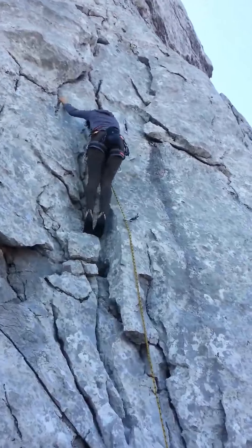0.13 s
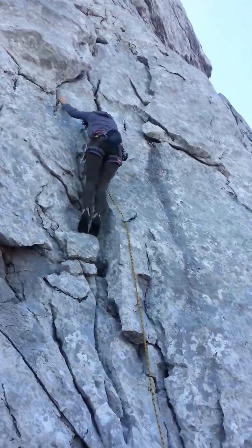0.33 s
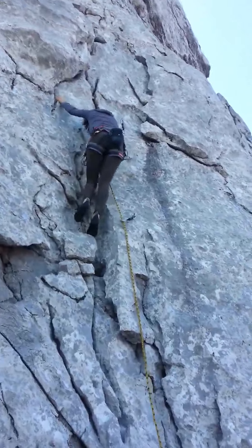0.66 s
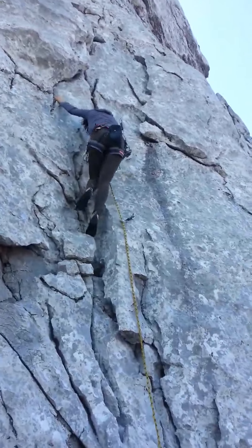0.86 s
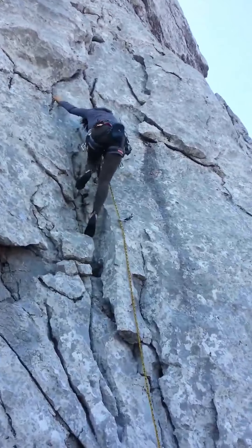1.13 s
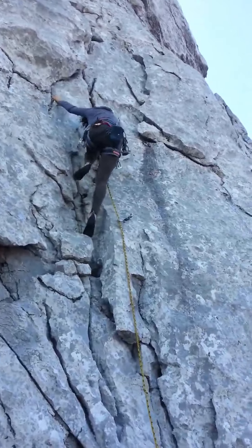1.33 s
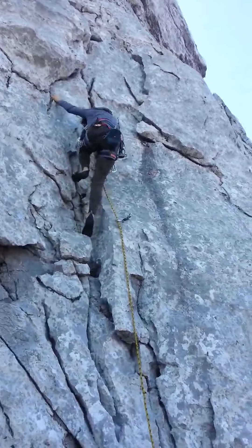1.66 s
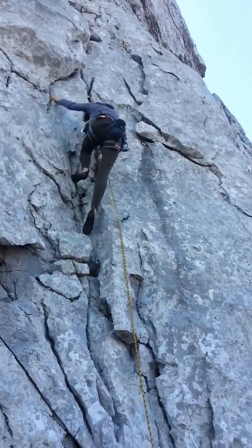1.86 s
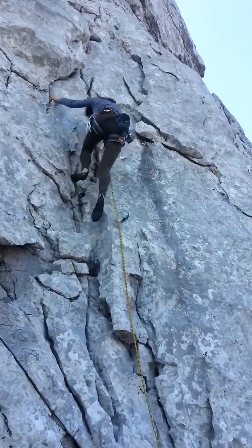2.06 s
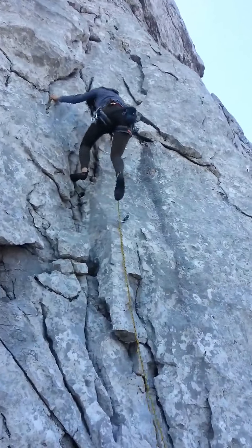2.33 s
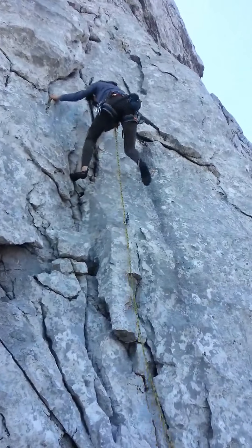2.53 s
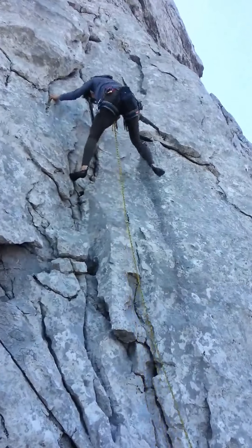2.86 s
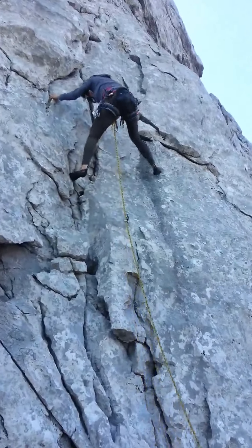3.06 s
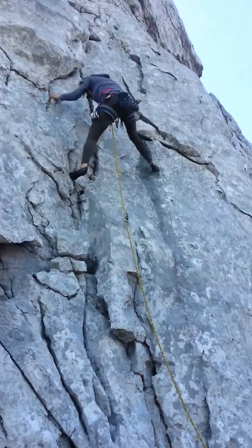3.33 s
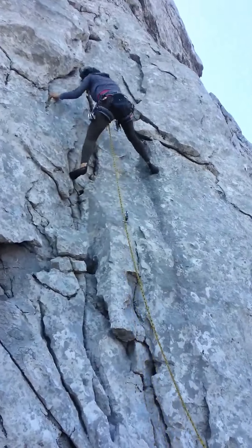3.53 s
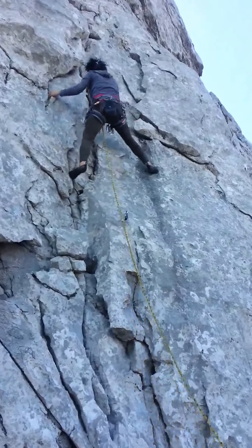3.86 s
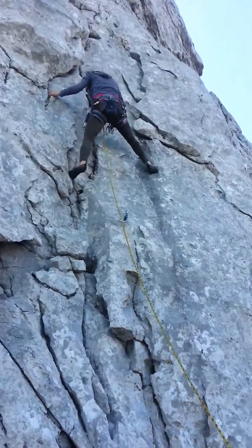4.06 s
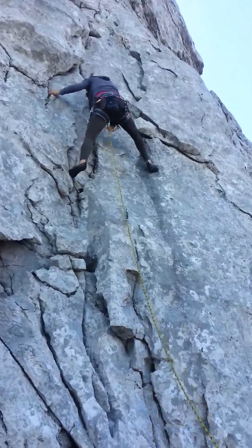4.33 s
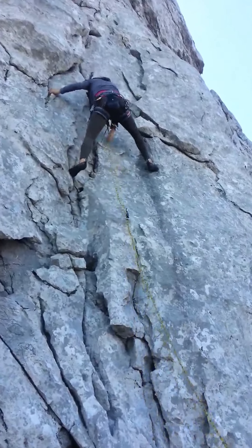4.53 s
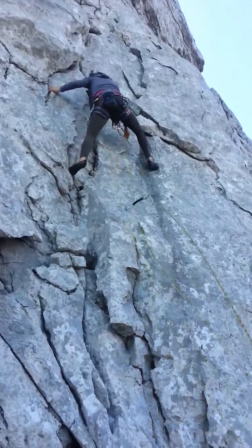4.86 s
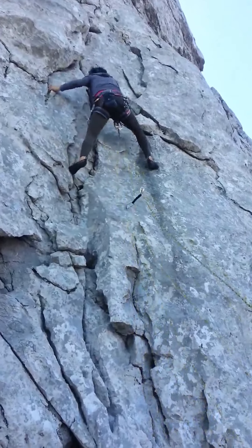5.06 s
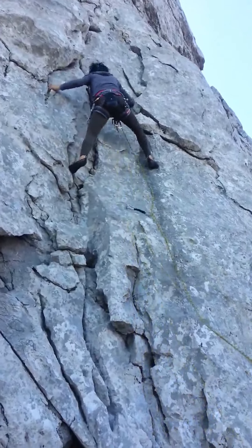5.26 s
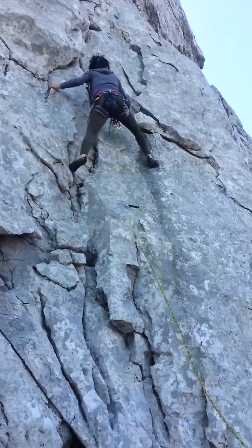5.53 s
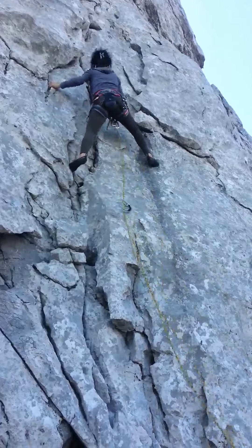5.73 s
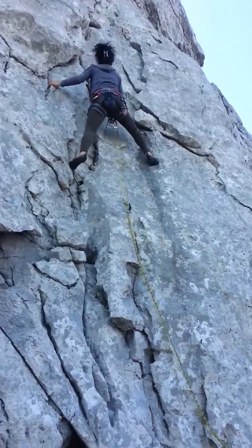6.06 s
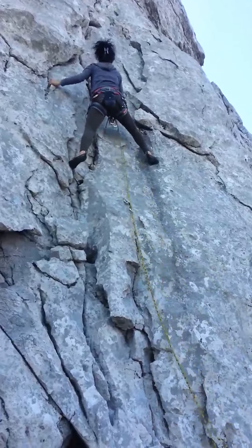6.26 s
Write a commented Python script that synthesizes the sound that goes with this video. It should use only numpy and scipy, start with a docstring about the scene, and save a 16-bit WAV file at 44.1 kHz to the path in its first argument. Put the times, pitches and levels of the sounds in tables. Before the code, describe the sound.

Outdoors below a cliff, faint distant wind and microphone hiss lie under the irregular clinking of metal climbing gear. The pieces first chatter and jingle lightly, then tick only now and then, before clacking together in several stronger bursts, the loudest near the end. Now and again metal snaps against stone, and shoes and rope bump and rub quietly on the rock. The knocks are crisp and die away quickly.

```python
"""Outdoors below a rock face: metal gear knocks together on a climber's harness.
Each knock is a short chatter of contacts in heavily damped metal, scattered back by the rough rock.
Hanging pieces ring and jingle, metal snaps on stone, shoes and rope thud and scuff.
Far valley air and microphone hiss lie underneath."""
import sys
import numpy as np
from scipy import signal
from scipy.io import wavfile

SR = 44100
rng = np.random.default_rng(int(sys.argv[2]) if len(sys.argv) > 2 else 0)


def store_pcm(level_fs):
    """Save levels as 16-bit WAV."""
    pcm = np.round(np.clip(level_fs, -1, 1) * 32767).astype(np.int16)
    wavfile.write(sys.argv[1], SR, np.atleast_2d(pcm).T)


N = 282681


def from_db(db):
    return 10 ** (np.asarray(db) / 20)


def unit_rms(x):
    return x / np.sqrt(np.mean(x ** 2) + 1e-20)


def at_hz(points, hz):
    points_hz, values = np.transpose(points)
    return np.interp(np.log(hz), np.log(points_hz), values)


def pan(left_minus_right_db):
    return from_db([[left_minus_right_db / 2], [-left_minus_right_db / 2]])


def add(out, start_s, sound):
    i = round(start_s * SR)
    out[:, i:i + sound.shape[1]] += sound[:, :N - i]


def grains(shape, per_s, uneven_db):
    """Sparse clicks of uneven size and random sign."""
    sizes = from_db(uneven_db * np.minimum(rng.exponential(1, shape), 4))
    return sizes * rng.choice([-1, 1], shape) * (rng.random(shape) < per_s / SR)


def damped_mode(force, hz, t60_s):
    """One resonance driven by a force."""
    r, w = np.exp(-np.log(1000) / (t60_s * SR)), 2 * np.pi * hz / SR
    return signal.lfilter([0, np.sin(w)], [1, -2 * r * np.cos(w), r * r], force + 1e-18)


def metal_body(force, modes, tints_db, draws):
    """Parallel modes; each blow finds the pieces lying differently, so pitch and strength shift."""
    out = 0
    for (hz, db, t60_s, pan_db), tint_db, draw in zip(modes, tints_db, draws):
        shifted_hz = min(hz * (1 + .035 * draw[0]), 15000)
        gain = from_db(db + tint_db + 2.2 * draw[1:, None]) * pan(pan_db)
        out = out + gain * damped_mode(force, shifted_hz, t60_s) / np.sqrt(t60_s)
    return out


# Damped modes of the bunched gear, low (clank) and high (tick).
# Each row: frequency in Hz, relative level in dB, t60 in seconds, left minus right in dB.
CLANK_MODES = [(2150, -4, .006, 6), (2660, 2, .013, 7), (3150, -3, .007, 6)]
TICK_MODES = [(4310, 14, 0.0072, 4.5), (5370, 12, 0.0045, 11.5), (6500, 10, 0.0011, 11.5),
              (6790, -6.5, 0.0064, 14.5), (7720, 18.5, 0.0072, 1.5), (9400, 3, 0.012, 21),
              (11400, -13, 0.005, 1), (11940, 3, 0.0021, -12), (13700, -5.5, 0.00057, -6)]
# Each row: start in seconds, tick peak in dB, clank rms over the first 10 ms in dB, tick centre in Hz.
GEAR_KNOCKS = [(0.2296, -42, -53.5, 5400), (0.2851, -24, -46.5, 5800), (.303, -27, -47, 11100),
               (0.3207, -28.5, -47.5, 9020), (0.3363, -35, -49, 6600), (0.3693, -33, -49.5, 5270),
               (.4057, -32.5, -53, 8100), (0.434, -34, -60, 5500), (0.4548, -27, -51, 8360),
               (.521, -22.5, -56, 6200), (0.5662, -32.5, -50.5, 7840), (0.5926, -38, -68, 5080),
               (0.635, -40, -51, 4150), (0.6524, -47, -48, 7990), (0.6861, -42.5, -44, 6560),
               (0.7026, -49, -48, 4360), (0.736, -53, -56, 4000), (0.7453, -53, -51, 7040),
               (0.79, -58, -56, 4050), (0.8068, -40, -70, 5380), (0.9426, -37.5, -58, 5490),
               (1.175, -33.5, -60, 6700), (1.2402, -27.5, -48.5, 8560), (1.302, -29, -51.5, 10500),
               (1.3268, -35, -55.5, 8470), (1.355, -30.5, -48, 5700), (1.753, -49, -54.5, 6500),
               (2.0784, -40, -58, 5530), (2.3272, -36.5, -56, 5370), (2.5134, -47, -57.5, 5200),
               (2.6506, -30, -73, 11000), (2.6681, -26, -72, 7800), (2.804, -39, -57, 7600),
               (2.972, -36, -56, 7760), (3.034, -44, -69, 6000), (3.042, -30, -50.5, 7850),
               (3.1527, -18.5, -37, 8040), (3.1634, -19, -42.5, 6650), (3.243, -33, -56.5, 7040),
               (3.5357, -25.5, -49, 7200), (3.8456, -38.5, -67, 8000), (4.091, -42.5, -61, 8700),
               (4.2564, -7.5, -34, 8900), (4.2688, -7.5, -36.5, 10000), (4.3117, -20, -50, 8900),
               (4.318, -15.5, -41, 8820), (4.344, -28, -42, 5000), (4.35, -24.5, -44, 7100),
               (4.396, -41, -47, 7550), (4.4853, -24, -83, 9500), (4.7103, -33.5, -50, 4330),
               (4.782, -50, -61, 6400), (4.8947, -22.5, -40, 4740), (5.0464, -26, -47.5, 6600),
               (5.103, -28.5, -43.5, 7500), (5.1742, -39.5, -46, 3840), (5.2043, -48, -44, 4100),
               (5.251, -52, -48, 5170), (5.2685, -31, -46, 4480), (5.3331, -25, -31.5, 7700),
               (5.3366, -3.5, -25, 8400), (5.3453, -16, -32, 7800), (5.4293, -32, -74, 4840),
               (5.4404, -43, -48, 4650), (5.549, -46, -57, 4580), (5.589, -22, -40, 5600),
               (5.6145, -16, -33, 7600), (5.674, -34, -43, 4000), (5.6766, -13.5, -38, 8700),
               (5.904, -30, -64, 6660)]


def gear_knocks(chatter_s=.0038, scatter_t60_s=.13, scatter_gain_db=-36, spray_gain_db=-15.5):
    """A few ms of contacts and their patter of rock echoes drive the metal's modes."""
    out, t = np.zeros((2, N)), np.arange(int(.16 * SR)) / SR
    tick_hz = np.array(TICK_MODES)[:, 0]
    spread_octaves, left_lag_samples = .68, 4
    bass_cut = signal.butter(4, 1900, "high", fs=SR, output="sos")  # small parts radiate no bass
    tick_cut = signal.butter(2, 3000, "high", fs=SR, output="sos")
    spray_band = signal.butter(2, [1500, 10300], "band", fs=SR, output="sos")
    attack, fade = 1 - np.exp(-t / .00098), np.exp(-(t / chatter_s) ** 2)
    echo_envelope = np.exp(-np.log(1000) * t / scatter_t60_s) * (1 - fade)
    for start_s, tick_db, clank_db, centre_hz in GEAR_KNOCKS:
        contacts = grains(len(t), per_s=6600, uneven_db=4.5) * attack * fade
        contacts[20] = .29  # first touch
        contacts /= np.linalg.norm(contacts)
        direct = np.array([np.roll(contacts, left_lag_samples), contacts])
        patter = rng.standard_normal((2, len(t))) * echo_envelope
        force = signal.sosfilt(bass_cut, direct + from_db(scatter_gain_db) * patter)
        draws = rng.standard_normal((len(CLANK_MODES) + len(TICK_MODES), 3))
        clank = metal_body(force, CLANK_MODES, np.zeros(len(CLANK_MODES)), draws)
        clank /= np.sqrt(np.mean(clank[:, :int(.01 * SR)] ** 2))
        tints_db = -6 * (np.log2(tick_hz / centre_hz) / spread_octaves) ** 2
        tick = metal_body(force, TICK_MODES, tints_db, draws[len(CLANK_MODES):])
        tick = signal.sosfilt(tick_cut, tick)
        tick /= np.abs(tick).max(axis=1).mean()
        spray = from_db(spray_gain_db) * signal.sosfilt(spray_band, patter[::-1])  # unpitched echoes
        add(out, start_s, from_db(clank_db) * clank + from_db(tick_db) * (tick + spray))
    return out


# Decay of hanging pieces. Each row: frequency in Hz, t60 in seconds.
RING_DECAY = [(2680, 0.07), (4000, 0.078), (6630, 0.012), (10900, .055)]
# Each row: start in seconds, peak in dB, pitch in Hz.
HANGING_RINGS = [(0.302, -33.5, 11040), (0.407, -43, 2650), (1.248, -48, 10700), (1.304, -42, 10850),
                 (1.356, -47, 3900), (2.146, -56, 2600), (2.333, -47, 3900), (2.692, -43.5, 4020),
                 (3.19, -45, 3950), (4.783, -36.5, 6630), (5.205, -41, 4120), (5.441, -40, 3510),
                 (5.909, -43, 2680)]


def hanging_rings(jostle_s=.0045):
    """A freely hanging piece is jostled and sings on briefly in one wavering mode."""
    out, t = np.zeros((2, N)), np.arange(int(.15 * SR)) / SR
    for start_s, peak_db, hz in HANGING_RINGS:
        force = rng.standard_normal((2, len(t))) * np.exp(-t / jostle_s)
        tone = damped_mode(force, hz, at_hz(RING_DECAY, hz))
        add(out, start_s, from_db(peak_db) * tone / np.abs(tone).max())
    return out


# Each row: start in seconds, end in seconds, level in dB, pitch in Hz.
HARNESS_SWAYS = [(0.27, 0.562, -58, 2660), (0.627, .77, -56.5, 2130), (2.752, 3.123, -68, 3940),
                 (4.813, 4.92, -49, 3240), (4.837, 4.937, -48.5, 4440), (5.0, 5.37, -60, 2670)]


def harness_jingle(edge_s=.046):
    """While the harness sways, small uneven jolts keep one gear mode ringing."""
    out, t = np.zeros((2, N)), np.arange(SR // 2) / SR
    for start_s, end_s, db, hz in HARNESS_SWAYS:
        jolts = grains((2, len(t)), per_s=590, uneven_db=2)
        sway = np.clip(np.minimum(t, end_s - start_s - t) / edge_s, 0, 1)
        add(out, start_s, from_db(db) * sway * unit_rms(damped_mode(jolts, hz, t60_s=.015)))
    return out


# Each row: start in seconds, peak before panning in dB, nominal band centre in Hz.
STONE_SNAPS = [(1.711, -47, 2020), (2.292, -38, 1270), (3.172, -30, 2290), (3.443, -47, 1700),
               (3.473, -30, 2300), (5.346, -20, 1860), (6.1569, -21.5, 3400), (6.196, -42, 3500)]


def stone_snaps(scatter_t60_s=.14, pan_db=3):
    """One dry contact of metal on stone: a band-limited click with faint patter from the rock."""
    out, t = np.zeros((2, N)), np.arange(int(.08 * SR)) / SR
    for start_s, peak_db, hz in STONE_SNAPS:
        patter = .032 * rng.standard_normal((2, len(t))) * np.exp(-np.log(1000) * t / scatter_t60_s)
        band = signal.butter(4, [hz / 2, hz * 1.39], "band", fs=SR, output="sos")
        snap = signal.sosfilt(band, (t == 0) + patter)
        add(out, start_s, from_db(peak_db) * pan(pan_db) * snap / np.abs(snap).max())
    return out


# Each row: start in seconds, peak before panning in dB, pitch in Hz.
STONE_THUDS = [(.294, -35.5, 470), (.386, -40, 643), (.7, -43.5, 265), (1.71, -42.5, 292),
               (2.291, -40, 960), (3.169, -28, 720), (3.443, -40.5, 880), (3.471, -41, 533),
               (4.24, -46, 373), (4.327, -38, 900), (4.864, -41, 476), (4.891, -40, 423), (5.345, -31, 370),
               (5.622, -41.5, 344), (5.677, -36.5, 675)]


def stone_thuds(t60_cycles=5.9, pan_db=1.4):
    """Shoes, rope and gear land softly on stone: grit drives a dull mode and two broader overtones."""
    out, t = np.zeros((2, N)), np.arange(int(.12 * SR)) / SR
    envelope = np.exp(-t / .0091) * (1 - np.exp(-t / .00044))
    for start_s, peak_db, hz in STONE_THUDS:
        noise, t60_s = rng.standard_normal((3, len(t))), t60_cycles / hz
        bass_cut = signal.butter(4, .83 * hz, "high", fs=SR, output="sos")
        force = signal.sosfilt(bass_cut, (noise[0] + .81 * noise[1:]) * envelope)
        thud = damped_mode(force, hz, t60_s)
        thud += .39 * damped_mode(force, 1.26 * hz, t60_s / 2)
        thud += .42 * damped_mode(force, 2.76 * hz, t60_s / 3)
        add(out, start_s, from_db(peak_db) * pan(pan_db) * thud / np.abs(thud).max())
    return out


def drift(corner_hz, hop=40):
    """Slow random wander of unit rms."""
    r = np.exp(-2 * np.pi * corner_hz * hop / SR)
    noise = rng.standard_normal(N // hop + 2002)
    slow = signal.lfilter([1], [1, -2 * r, r * r], noise)[2000:]
    return np.interp(np.arange(N) / hop, np.arange(len(slow)), unit_rms(slow))


# Stereo width of scuff and air. Each row: frequency in Hz, left-right correlation.
STEREO_CORRELATION = [(60, -0.012), (180, 0.14), (550, 0.11), (1650, -0.051), (4970, -0.023),
                      (15000, -0.11)]


def flickering_bands(noises, spectrum, flicker_db, calmer_above_hz=1040):
    """Half-octave noise bands, each with its own level, flicker and stereo width."""
    out, edges_hz = 0, 22 * 2 ** np.arange(0, 10, .5)
    for k, (low_hz, high_hz) in enumerate(zip(edges_hz, edges_hz[1:])):
        band = signal.butter(2, [low_hz, high_hz], "band", fs=SR, output="sos")
        mid, side = signal.sosfilt(band, noises[k % 2])
        hz = np.sqrt(low_hz * high_hz)
        correlation = at_hz(STEREO_CORRELATION, hz)
        stereo = np.sqrt(1 + correlation) * mid + np.sqrt(1 - correlation) * side * [[1], [-1]]
        depth_db = flicker_db * min(1, calmer_above_hz / hz) ** .17
        out = out + from_db(at_hz(spectrum, hz) + depth_db * drift(corner_hz=19)) * stereo
    return out


# Rubbing strength. Each row: time in seconds, gain in dB.
SCUFF_ENVELOPE = [(0, -64.5), (.21, -63), (.3, -51.5), (.62, -58), (.7, -54.5), (.78, -59.5), (1.69, -64),
                  (1.73, -60), (1.85, -66.5), (2.62, -64.5), (2.67, -57.5), (2.8, -60.5), (3.05, -58),
                  (3.3, -63.5), (4.22, -66.5), (4.3, -50.5), (4.45, -58.5), (4.68, -64), (4.81, -53),
                  (4.87, -46), (4.95, -58), (5.45, -54.5), (5.85, -61.5), (5.95, -54), (6.1, -61.5),
                  (6.41, -64.5)]
# Each row: frequency in Hz, band gain in dB.
SCUFF_SPECTRUM = [(90, -41), (220, 11.5), (500, 9.5), (1200, 2), (2600, 5.5), (4500, 1.5), (8000, -2.5),
                  (15000, -8)]


def rope_scuff(pan_db=2):
    """Cloth and rope rub in dense gritty grains."""
    times_s, gains_db = np.transpose(SCUFF_ENVELOPE)
    rubbing = from_db(np.interp(np.arange(N) / SR, times_s, gains_db))
    grit = unit_rms(grains((2, 2, N), per_s=7000, uneven_db=2.5))
    return rubbing * pan(pan_db) * flickering_bands(grit, SCUFF_SPECTRUM, flicker_db=3.5)


# Each row: frequency in Hz, relative band gain in dB.
AIR_SPECTRUM = [(15, -40), (25, -12), (47, -5), (117, 4), (205, 1.5), (368, -5.5), (755, -10),
                (1190, -10.5), (2640, -21.5), (5860, -26), (8510, -18), (13000, -17), (14500, -22)]


def valley_air(rms_db=-57.8):
    """Far wind and valley noise in the bass, microphone hiss above."""
    noises = rng.standard_normal((2, 2, N))
    return from_db(rms_db) * unit_rms(flickering_bands(noises, AIR_SPECTRUM, flicker_db=2.5))


def scene():
    metal = gear_knocks() + hanging_rings() + harness_jingle() + stone_snaps()
    return metal + stone_thuds() + rope_scuff() + valley_air()


def record(dry):
    """A steep low-pass cuts the top treble."""
    cutoff_hz = 14700
    return signal.sosfilt(signal.cheby1(10, .5, cutoff_hz, fs=SR, output="sos"), dry)


dry = scene()
out = record(dry)
store_pcm(out)
```